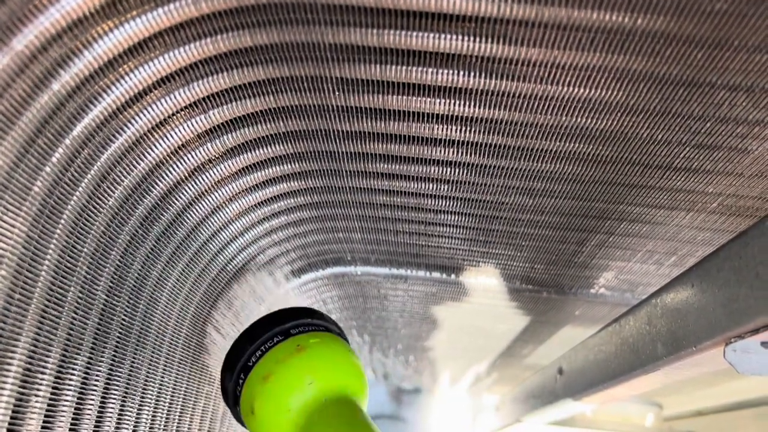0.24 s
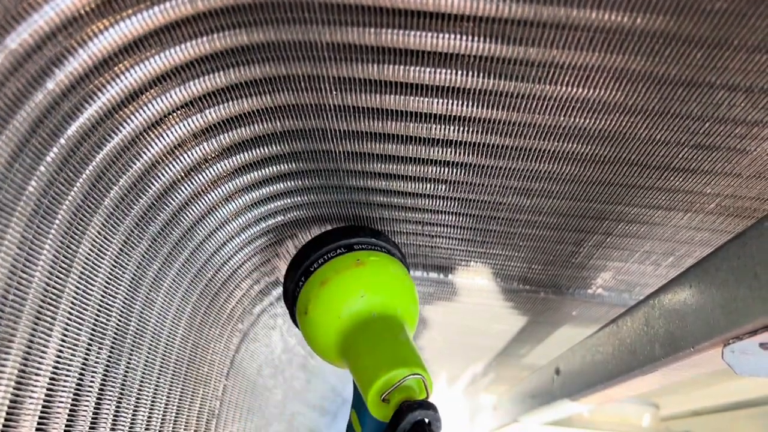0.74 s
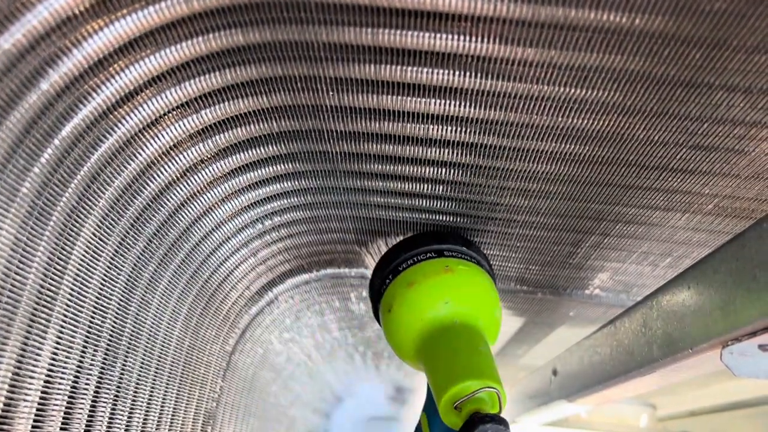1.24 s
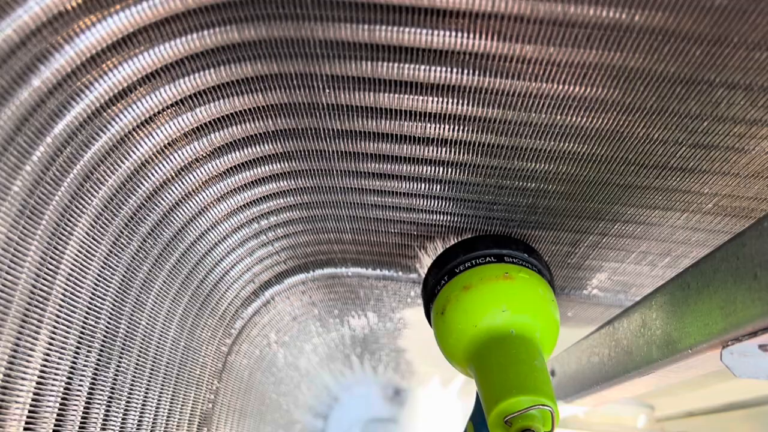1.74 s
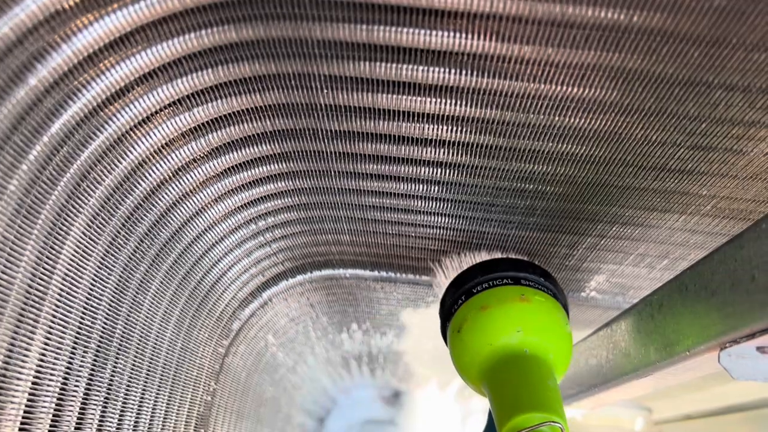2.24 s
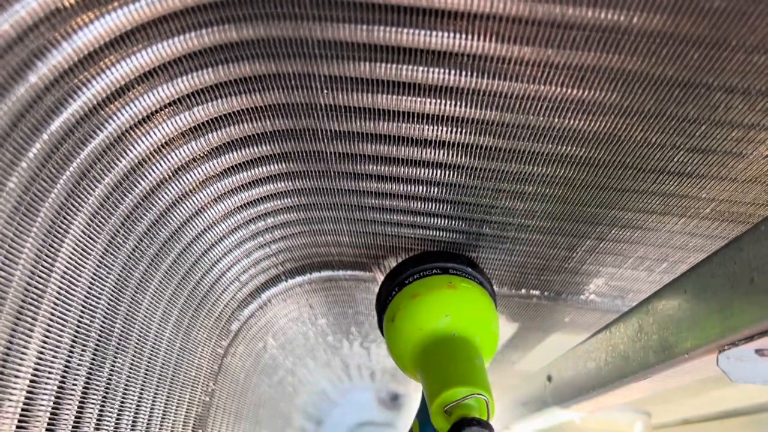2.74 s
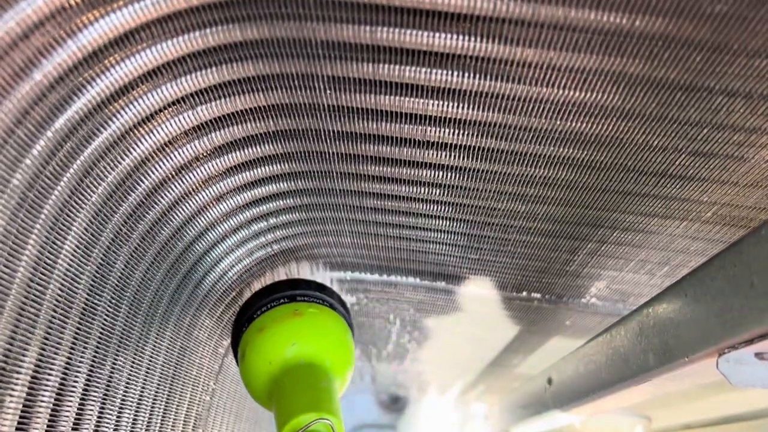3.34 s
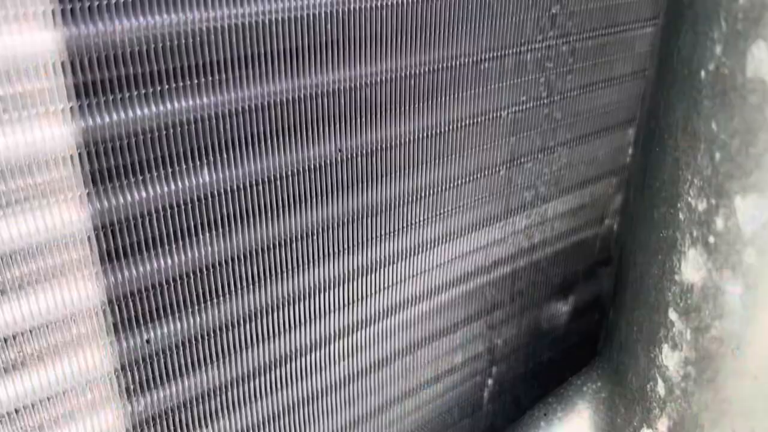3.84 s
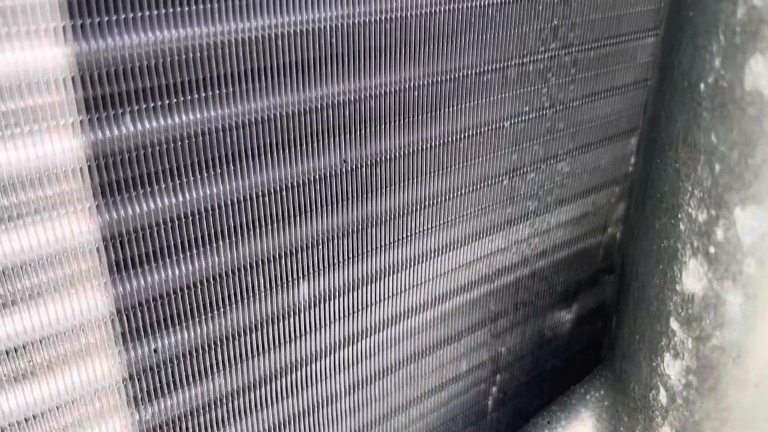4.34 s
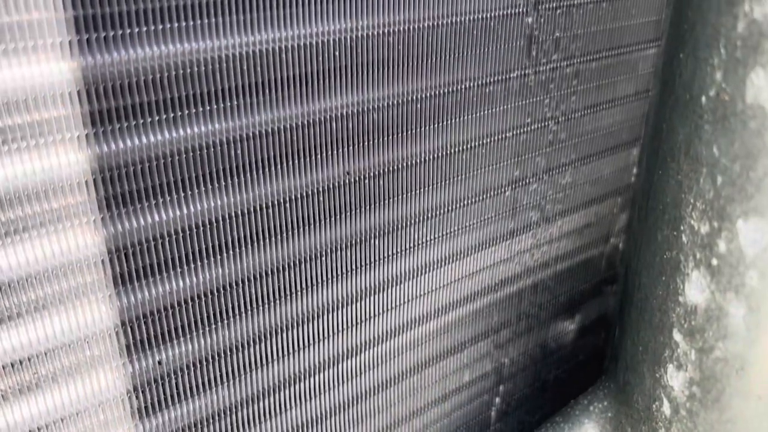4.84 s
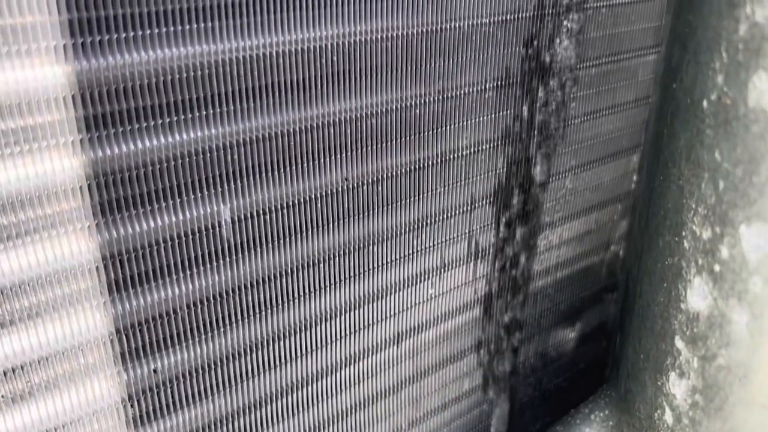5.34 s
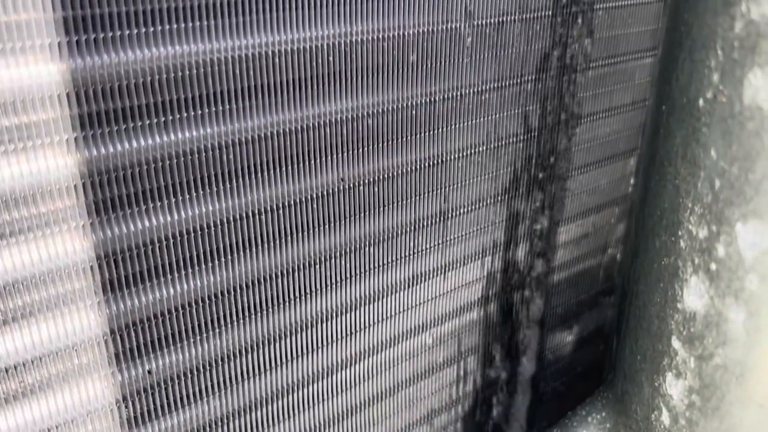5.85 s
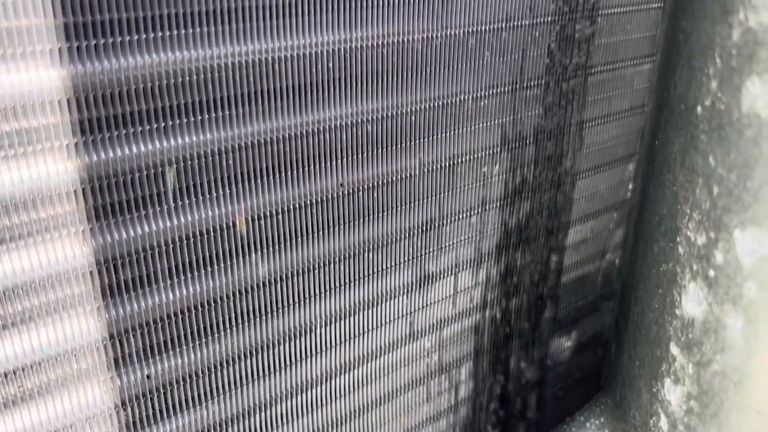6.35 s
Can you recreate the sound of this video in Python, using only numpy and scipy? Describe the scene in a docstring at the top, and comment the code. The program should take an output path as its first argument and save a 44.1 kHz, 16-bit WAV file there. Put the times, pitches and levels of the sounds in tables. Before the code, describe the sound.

Steady water spray hisses over thin metal fins of an outdoor cooling unit, then cuts to a louder, brighter close hiss with soft casing thumps.

```python
"""Hosing down a cooling unit

A hose nozzle showers the finned coil of an outdoor cooling unit. It is heard first from inside the casing, then,
after a short fade, from close outside the fins. Shaped noise makes the hiss of drops on thin metal, the mist and
the ringing fin channels. Low noise makes the casing rumble, and soft pushes thump it. Decaying tones make its
knocks, and short tones that fall in pitch are stray drops tapping near the microphone.
"""
import sys
import numpy as np
from scipy import signal
from scipy.fft import rfft, irfft, next_fast_len
from scipy.io import wavfile

SR = 44100
rng = np.random.default_rng(int(sys.argv[2]) if len(sys.argv) > 2 else 0)


def master(y):
    """Save y as 16-bit WAV."""
    cut = np.clip(np.atleast_2d(y).T, -1, 1)
    pcm = np.round(cut * 32767)  # scale
    wavfile.write(sys.argv[1], SR, pcm.astype(np.int16))


N = 290178   # length in samples
SIZE = next_fast_len(N)
HZ = np.maximum(np.arange(SIZE // 2 + 1) * SR / SIZE, 1)   # frequency of each spectrum bin
TIME = np.arange(N) / SR   # seconds

CHANGE_S = 3.869   # silent moment between the two listening places
FADE_OUT_S, FADE_IN_S = 0.032, 0.029
CUTOFF_HZ = 15720

# Spray as the nozzle sweeps across and back: (time [s], fins level [dB], mist level [dB],
# low channel pitch [Hz], its level [dB], high channel pitch [Hz], its level [dB])
SPRAY_INSIDE = [(0.0, -42, -34.5, 2295, -46.5, 4610, -48.5), (0.5, -44, -38, 2330, -46.5, 4770, -54),
                (1.1, -44.5, -38.5, 2343, -48.5, 4480, -55.5), (1.45, -44.5, -39.5, 2339, -45, 4344, -54),
                (1.75, -46, -39, 2330, -45.5, 4254, -48), (1.95, -44.5, -39, 2357, -45.5, 4210, -49),
                (2.1, -44, -34.5, 2370, -49, 4330, -53), (2.2, -44, -39, 2358, -48, 4290, -49),
                (2.34, -43, -38, 2370, -49, 4340, -51), (2.65, -45.5, -41, 2343, -51.5, 4404, -51.5),
                (3.1, -44.5, -37, 2366, -49, 4460, -53.5), (3.45, -44.5, -39, 2442, -51.5, 4690, -63),
                (3.63, -44, -38, 2466, -48, 4680, -52), (3.8, -42, -37, 2315, -48.5, 4700, -50)]
SPRAY_OUTSIDE = [(3.9, -37.5, -47, 1930, -49.5, 6790, -50), (4.0, -36, -43, 1898, -45.5, 6806, -46),
                 (4.15, -33, -36, 1860, -46.5, 6900, -40.5), (4.6, -31, -36, 1855, -44, 7020, -36.5),
                 (5.05, -32, -36, 1870, -43, 6910, -37.5), (5.35, -30.5, -33.5, 1882, -44, 6970, -36.5),
                 (5.75, -34, -36.5, 1922, -46, 6800, -40.5), (6.1, -34, -37, 1897, -43, 6630, -41.5),
                 (6.55, -33, -40, 1912, -47, 6650, -42)]
# Colour of the drops on the fins: (frequency [Hz], relative level [dB per Hz])
FINS_INSIDE = [(200, -9), (350, -4), (500, -4.5), (750, -5.5), (1050, -3), (1400, -3), (1600, -5.5),
               (1750, 0.5), (2300, 2), (2950, -1.5), (3500, -1), (4750, -1.5), (4950, -2.5), (5250, 0),
               (5900, -0.5), (6500, 2), (7600, -3), (9500, -2), (15000, -31)]
FINS_OUTSIDE = [(200, -14), (350, -27.5), (500, -10.5), (700, -8), (850, -6.5), (1080, -11.5), (1220, -3.5),
                (1470, -3.5), (1600, -6), (1800, -4.5), (2250, 0), (2650, 1), (3100, -1.5), (3270, 0),
                (3450, -3.5), (3700, 1), (4500, 1), (4830, 2.5), (5000, 1), (5150, 1.5), (6300, 3),
                (7500, -1.5), (8200, 3), (9500, -3), (15000, -8.5)]
# Colour of the fine spray at the nozzle: (frequency [Hz], relative level [dB per Hz])
MIST_INSIDE = [(5000, -25), (8000, -6.5), (10000, -3.5), (11200, 0), (13000, -1.5), (14600, 2.5),
               (15800, 0)]
MIST_OUTSIDE = [(5000, -27), (8000, -4), (10000, -11), (11200, 1.5), (13000, -3.5), (14600, -1),
                (15800, -0.5)]
# Smoothing corners that set how wide the channels ring: (low channel [Hz], high channel [Hz])
CHANNEL_CORNERS_INSIDE, CHANNEL_CORNERS_OUTSIDE = (141, 560), (90, 420)
# Other bands of noise that swell and fade, such as fin ringing, low hums and bursts of mist:
# (loudest time [s], length [s], level [dB], pitch at loudest time [Hz], glide [Hz per s], smoothing corner [Hz])
PASSING_INSIDE = [(2.2, 1.58, -52, 1395, -60, 295), (2.42, 1.1, -50.5, 3340, 9.5, 710),
                  (3.42, 0.08, -55, 2150, -100, 70), (3.8, 0.12, -56, 2020, -200, 61),
                  (1.7, .5, -53.5, 2530, 0.5, 37), (.63, .15, -52, 4720, -49.5, 180),
                  (2.35, 0.098, -44.5, 12800, 0, 900), (0.39, 0.5, -66, 197, -1, 9),
                  (0.095, .2, -52.5, 2020, 0, 96), (0.41, .14, -53, 1500, 0, 120),
                  (.93, 0.13, -59, 2800, 600, 60), (0.046, 0.22, -47.5, 7000, 0, 500),
                  (1.54, .3, -57, 1710, -1.5, 19), (0.92, 0.34, -60, 146, -0.5, 9.8)]
PASSING_OUTSIDE = [(5.2, 0.72, -54.5, 830, -45.5, 114), (4.2, 0.26, -45.5, 2520, -100, 55),
                   (4.95, 0.97, -48, 2480, 0, 66), (5.25, 0.69, -44.5, 2870, 30.5, 77),
                   (5.6, 0.37, -50, 2370, -0.5, 90), (5.19, 0.16, -39, 88, 0, 4.9),
                   (5.9, 1.1, -49, 2050, 30.5, 75), (4.83, 0.54, -49.5, 2030, -1, 70),
                   (4.0, .15, -51, 1900, 4.5, 100), (4.63, 0.43, -52, 2640, 0, 50),
                   (6.2, 0.34, -56, 2250, -1, 50), (3.95, 0.23, -51, 4330, 49, 180),
                   (5.5, 0.27, -46, 4500, -200, 250), (6.0, 0.52, -38.5, 5600, -500, 230),
                   (4.9, 1.2, -42.5, 7530, -51.5, 130)]

# Casing shaken by the water, steady level: (deep part [dB], panels [dB])
RUMBLE_INSIDE, RUMBLE_OUTSIDE = (-45.5, -56.5), (-43, -53)
# Colours of the deep part and of the panels: (frequency [Hz], relative level [dB per Hz])
RUMBLE_COLOUR = [(13, -37), (22, -15), (54, -1), (80, 2.5), (100, -3.5), (120, -12.5), (150, -15.5),
                 (250, -60), (400, -66)]
PANEL_COLOUR = [(60, -41), (120, -2.5), (148, 4), (172, -2.5), (198, 0), (215, -4), (260, -7.5),
                (380, -6.5), (500, -20.5), (900, -29.5)]
# The rumble swells or sags for a moment: (time [s], length [s], deep change [dB], panels change [dB])
SWELLS = [(0.377, 0.045, -4, 4.5), (0.798, 0.049, 1.5, -1.5), (1.825, 0.14, 5, -7), (2.302, 0.3, 2.5, 0),
          (2.8, 0.046, 6, -5), (3.113, 0.055, 4.5, 0), (3.901, 0.086, -1, 7.5), (4.115, 0.15, 1, 5.5),
          (4.47, 0.12, -1, 3), (5.194, 0.094, -11, 2), (5.33, 0.025, -5, 6.5), (5.444, 0.037, 6.5, 1),
          (5.51, 0.028, -13, 2), (5.914, 0.14, 2.5, 3.5), (6.533, 0.023, 6, 0)]

# Soft short pushes on the casing: (start time [s], level [dB], pitch [Hz])
THUMPS = [(0.383, -38.5, 297), (1.170, -39.5, 174), (1.515, -30.5, 73), (1.572, -31.5, 56),
          (1.811, -34, 76), (1.842, -32, 72), (3.792, -41.5, 360), (3.826, -38, 81), (3.885, -33, 99),
          (3.905, -35, 100), (4.505, -27, 66.5), (4.573, -30, 74.6), (5.304, -28, 141), (5.316, -34, 100),
          (5.338, -28.5, 64.5)]
# Stray drops: (start time [s], level [dB], final pitch [Hz], left louder by [dB], rise [s])
TAPS = [(1.1718, -35.5, 270, 2, 0.00095), (1.4044, -41, 380, 3, 0.0014), (2.459, -36, 298, 0, .0013),
        (3.0681, -33, 270, 3, .0017), (5.472, -38, 297.7, 0, .0014)]
# Knocks on the casing: (time [s], strength [dB], hardness [dB per octave], scuff fading time [s])
KNOCKS = [(3.574, -47.5, 8.5, 0.055), (3.888, -27, -3, 0.033), (3.97, -31.5, 1, 0.032),
          (4.352, -32, -4.5, 0.03), (4.392, -32.5, 1, 0.039), (4.469, -36, -3, 0.027),
          (4.56, -38, 0, 0.028)]
# Ringing modes of the casing: (pitch [Hz], level [dB], time to fade by 60 dB [s])
CASING = [(102, -9.5, 0.36), (149, -7, 0.105), (197.1, -10.5, 0.44), (213, -21, 0.2), (250.5, -35.5, 0.092),
          (361, -23, 0.34)]

# Stereo image by frequency: (frequency [Hz], phase of right against left [rad],
# likeness [0 to 1], left louder by [dB])
STEREO_INSIDE = [(70, 0, .91, .3), (150, 0, .75, .5), (260, 0, .58, .5), (1000, -.5, .55, 1.5),
                 (1500, 0, .1, -.9), (1750, 0, .5, 0), (2100, -.1, .9, .8), (2500, -.3, .88, 0),
                 (2750, -.7, .65, .3), (3400, -.9, .53, .5), (4100, -.4, .7, 1.4), (4600, -.3, .5, 1.6),
                 (5200, .8, .3, 1.3), (5550, 1.5, .35, 1.2), (5900, 1, .42, 1.1), (6300, .3, .75, 0),
                 (6400, 0, .995, 0), (7400, 0, .995, 0), (7600, .3, .72, 0)]
STEREO_OUTSIDE = [(45, 0, .88, 0), (90, 0, .96, 1.4), (300, 0, .56, 1.8), (1100, 0, .7, -1.3),
                  (1400, 0, .45, -1.5), (1600, 0, .2, -1.7), (1800, 0, .97, 0), (2200, 0, .97, 0),
                  (2750, -.7, .7, .7), (3500, -1.1, .44, 1.5), (4500, -.1, .6, 2.3), (4900, -.4, .25, 1.2),
                  (5150, 1.7, .3, .5), (5500, 2.3, .68, 2), (5850, 2.2, .65, 2.5), (6200, .8, .7, 1),
                  (6600, 0, .93, 0), (7400, 0, .9, 0)]
# Same columns for the treble in both places: the phase rests near 9-10 and 12-14 kHz,
# where the sides are almost alike, and turns between
STEREO_TREBLE = [(8300, 1.35, .65, .3), (9000, 2.5, .66, 0), (9200, np.pi, .999, 0),
                 (10400, np.pi, .999, 0), (10650, 3.4, .8, 0), (11050, 4.2, .63, 0), (11700, 5.3, .62, 0),
                 (11750, 2 * np.pi, .999, 0), (13720, 2 * np.pi, .999, 0), (13800, 7, .65, 0),
                 (14400, 8, .57, 0), (15000, 8.9, .78, 0), (15250, 3 * np.pi, .999, 0)]


def from_db(db):
    """Turn decibels into gain."""
    return 10 ** (np.asarray(db) / 20)


def rms_one(x):
    """Scale a sound to an average power of one."""
    return x / np.sqrt(np.mean(np.abs(x) ** 2) + 1e-20)


def in_time(rows):
    """Draw each column of a table as a curve, sample by sample."""
    s, *columns = np.transpose(rows)
    return [np.interp(TIME, s, column) for column in columns]


def in_hz(rows):
    """Draw each column of a table over frequency, bin by bin."""
    hz, *columns = np.transpose(rows)
    return [np.interp(np.log(HZ), np.log(hz), column) for column in columns]


def bump(s, length_s):
    """A bell shape in time, 1 at its top."""
    return np.exp(-((TIME - s) / length_s) ** 2)


def drift(rate_hz):
    """Slow random wander with spread 1, made by smoothing noise twice."""
    step, settle = 40, 2000   # one slow value every 40 samples; the first 2000 values are dropped
    r = np.exp(-2 * np.pi * rate_hz * step / SR)
    noise = rng.standard_normal(N // step + settle + 2)
    slow = signal.lfilter([1], [1, -2 * r, r * r], noise)[settle:]
    return np.interp(np.arange(N) / step, np.arange(len(slow)), rms_one(slow))


def drops(spectrum, patchy_db, patches_per_s, lowest_hz, count):
    """Two unrelated showers of tiny impacts, coloured; each quarter octave swells a little on its own."""
    hit = rng.random((2, N)) < .6   # an impact on about six samples in ten
    extra_db = np.minimum(rng.exponential(1, (2, N)), 3)
    impacts = hit * rng.standard_normal((2, N)) * from_db(extra_db)
    coloured = rfft(impacts, SIZE) * from_db(in_hz(spectrum)[0])
    place = np.clip(4 * np.log2(HZ / lowest_hz), 0, count - 1)   # counted in quarter octaves
    shower = np.zeros((2, N))
    for k in range(count):
        share = np.maximum(1 - np.abs(place - k), 0)   # neighbouring bands overlap
        band = irfft(coloured * share, SIZE)[:, :N]
        shower += band * from_db(patchy_db * drift(patches_per_s))
    return rms_one(shower)


def noise_band(centre_hz, corner_hz):
    """A ringing band, as from air gaps between fins: slow noise moved up to a pitch that can change with time."""
    r = np.exp(-2 * np.pi * corner_hz / SR)
    noise = rng.standard_normal((2, N)) + 1j * rng.standard_normal((2, N))
    slow = signal.lfilter([1], [1, -2 * r, r * r], noise)
    carrier = np.exp(2j * np.pi * np.cumsum(centre_hz) / SR)
    return rms_one((slow * carrier).real)


def spray(curves, fins, fine, corners_hz, bands, surge_db):
    """Hiss on the fins, mist, ringing channels and the other passing bands surge together with the flow."""
    fins_db, mist_db, low_hz, low_db, high_hz, high_db = in_time(curves)
    hiss = from_db(fins_db) * drops(fins, patchy_db=1.5, patches_per_s=13.2, lowest_hz=602, count=16)
    mist = from_db(mist_db) * drops(fine, patchy_db=1.5, patches_per_s=14, lowest_hz=7850, count=4)

    low_pitch = low_hz * (1 + .012 * drift(7.97))
    low = from_db(low_db + 1.43 * drift(13.4)) * noise_band(low_pitch, corners_hz[0])
    high = from_db(high_db + 1.57 * drift(11.0)) * noise_band(high_hz, corners_hz[1])

    passing = np.zeros((2, N))
    for s, length_s, db, hz, glide_hz, corner_hz in bands:
        pitch = hz + glide_hz * (TIME - s)
        passing += from_db(db) * bump(s, length_s) * noise_band(pitch, corner_hz)

    surge = from_db(surge_db * (.35 * drift(5) + .9 * drift(11)))
    return surge * (hiss + mist + low + high + passing)


def low_noise(spectrum):
    """Two unrelated draws of noise, coloured to follow a table."""
    noise = rfft(rng.standard_normal((2, N)), SIZE)
    return rms_one(irfft(noise * from_db(in_hz(spectrum)[0]), SIZE)[:, :N])


def rumble():
    """The whole casing shakes deeply, and its smaller panels drum higher up."""
    inside_db = np.array(RUMBLE_INSIDE)[:, None]
    outside_db = np.array(RUMBLE_OUTSIDE)[:, None]
    deep_db, panels_db = np.where(TIME < CHANGE_S, inside_db, outside_db)
    for s, length_s, deep_swell_db, panels_swell_db in SWELLS:
        deep_db = deep_db + deep_swell_db * bump(s, length_s)
        panels_db = panels_db + panels_swell_db * bump(s, length_s)
    deep = from_db(deep_db) * low_noise(RUMBLE_COLOUR)
    panels = from_db(panels_db) * low_noise(PANEL_COLOUR)
    return deep + panels


def thumps(cycles):
    """Each push is a brief low swing that grows and fades under a smooth bump."""
    out = np.zeros(N)
    for s, level_db, hz in THUMPS:
        turn = (TIME - s) * hz   # cycles since the start
        envelope = np.sin(np.pi * np.clip(turn / cycles, 0, 1)) ** 2
        out += from_db(level_db) * np.sin(2 * np.pi * turn) * envelope
    return out


def taps(glide, fall_s):
    """A drop bursting close by gives a very short tone that falls fast in pitch."""
    out = np.zeros((2, N))
    for s, level_db, hz, left_db, rise_s in TAPS:
        age = np.maximum(TIME - s, 0)
        # the pitch starts at (1 + glide) times its final value
        turns = hz * (age + glide * fall_s * (1 - np.exp(-age / fall_s)))
        envelope = (age / rise_s * np.exp(1 - age / rise_s)) ** 2
        blip = -np.sin(2 * np.pi * turns) * envelope
        out += blip * from_db([[level_db + left_db / 2], [level_db - left_db / 2]])
    return out


def ring(clicks, hz, t60):
    """A unit click sets off a sine of height 1 that dies away by 60 dB in t60 seconds."""
    r, w = from_db(-60 / (t60 * SR)), 2 * np.pi * hz / SR
    return signal.lfilter([0, np.sin(w)], [1, -2 * r * np.cos(w), r * r], clicks + 1e-18)


def knocks(scuff_share):
    """A dull knock is one push and a short scuff into all casing modes; harder ones favour the upper modes."""
    blows, uneven = [], rng.standard_normal(N)
    for s, strength_db, hardness_db, scuff_s in KNOCKS:
        length = max(scuff_s, .002)
        fading = (TIME >= s) * np.exp(-np.abs(TIME - s) / length)
        blow = scuff_share * uneven * fading / np.sqrt(length * SR / 2)   # same energy at any length
        blow[int(s * SR)] += 1   # the push
        blows.append(blow)

    _, strength_db, hardness_db, _ = np.transpose(KNOCKS)
    rings = np.zeros(N)
    for hz, level_db, t60 in CASING:
        octaves_up = np.log2(hz / CASING[0][0])   # above the lowest mode
        gains = from_db(strength_db + level_db + hardness_db * octaves_up)
        rings += ring(gains @ blows, hz, t60)
    # a soft contact has no click
    return signal.sosfilt(signal.butter(2, 450, fs=SR, output="sos"), rings)


def stereo_image(pair, table):
    """The left side gets the first sound; the right gets it phase-shifted and partly replaced by the second."""
    phase, alike, left_db = in_hz(table + STEREO_TREBLE)
    alike = np.clip(alike, 0, 1)
    first, second = rfft(pair, SIZE)
    mixed = alike * first + np.sqrt(1 - alike ** 2) * second   # keeps the power when both are equally strong
    left = first * from_db(left_db / 2)
    right = mixed * np.exp(1j * phase) * from_db(-left_db / 2)
    return irfft([left, right], SIZE)[:, :N]


def scene():
    """Both listening places, joined by a fade through silence."""
    pushes, blows = thumps(cycles=2.6), knocks(scuff_share=1.0)
    casing = rumble() + np.array([pushes + blows, .25 * pushes + .2 * blows])
    near = taps(glide=5.55, fall_s=0.0011)

    spray_inside = spray(SPRAY_INSIDE, FINS_INSIDE, MIST_INSIDE, CHANNEL_CORNERS_INSIDE,
                         PASSING_INSIDE, surge_db=0.23)
    spray_outside = spray(SPRAY_OUTSIDE, FINS_OUTSIDE, MIST_OUTSIDE, CHANNEL_CORNERS_OUTSIDE,
                          PASSING_OUTSIDE, surge_db=0.47)
    inside = stereo_image(casing + spray_inside, STEREO_INSIDE)
    outside = stereo_image(casing + spray_outside, STEREO_OUTSIDE)

    fade_out = np.clip((CHANGE_S - TIME) / FADE_OUT_S, 0, 1)
    fade_in = np.clip((TIME - CHANGE_S) / FADE_IN_S, 0, 1)
    return (inside + near) * fade_out + (outside + near) * fade_in


def record(dry):
    """The microphone drops the deepest bass; the top is cut steeply."""
    no_bass = signal.sosfilt(signal.butter(4, 38, "high", fs=SR, output="sos"), dry)
    return signal.sosfilt(signal.ellip(12, .5, 75, CUTOFF_HZ, fs=SR, output="sos"), no_bass)


dry = scene()
out = record(dry)
master(out)
```